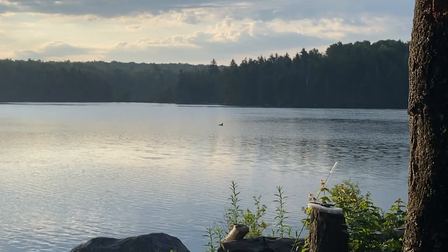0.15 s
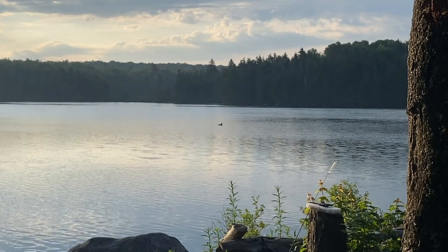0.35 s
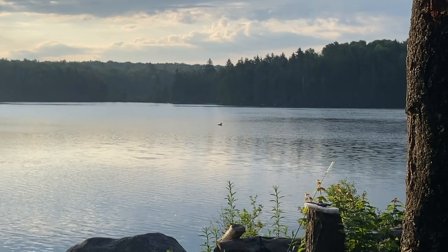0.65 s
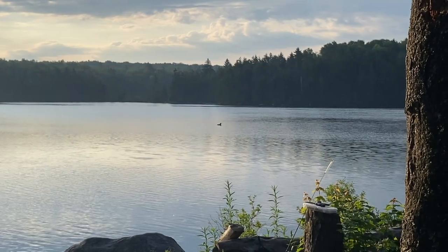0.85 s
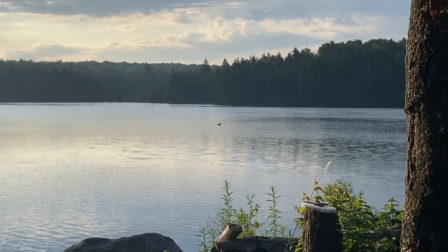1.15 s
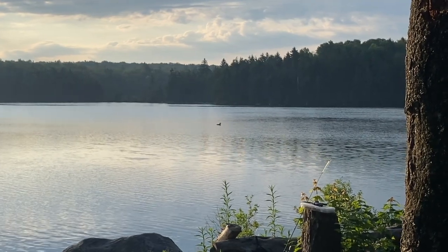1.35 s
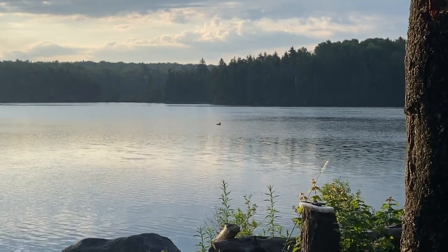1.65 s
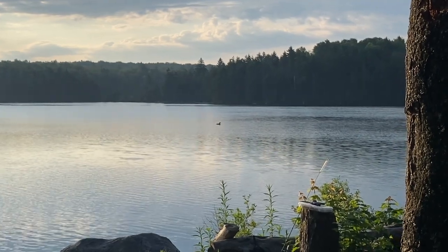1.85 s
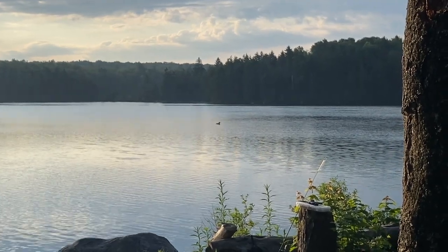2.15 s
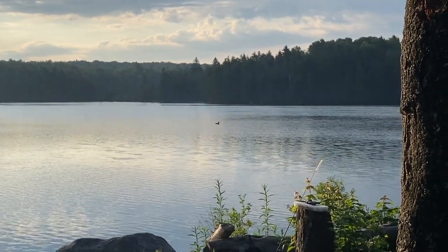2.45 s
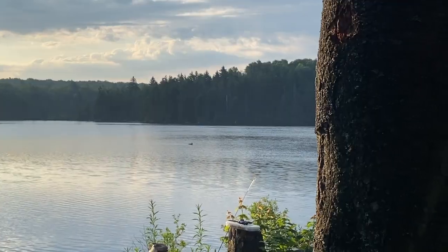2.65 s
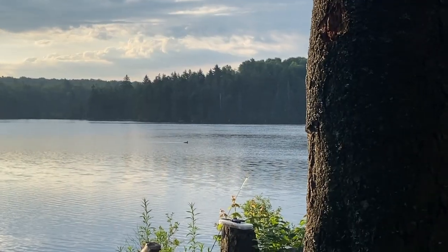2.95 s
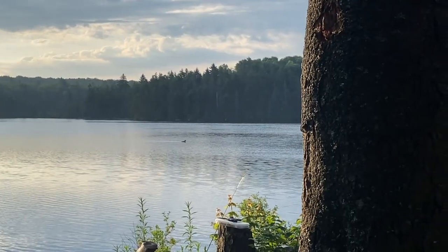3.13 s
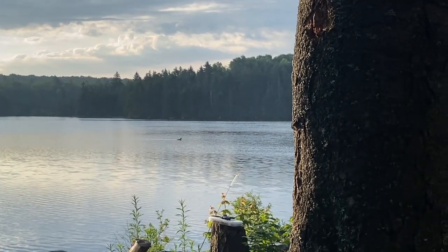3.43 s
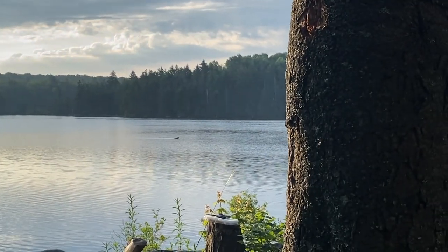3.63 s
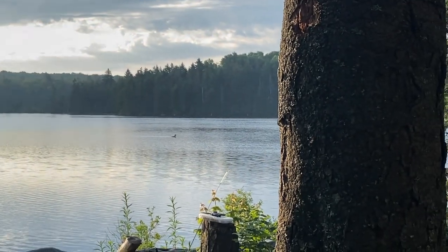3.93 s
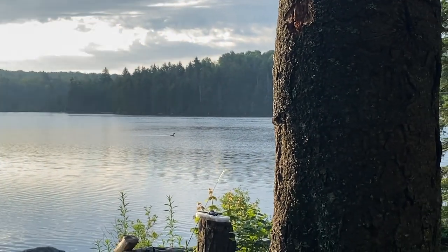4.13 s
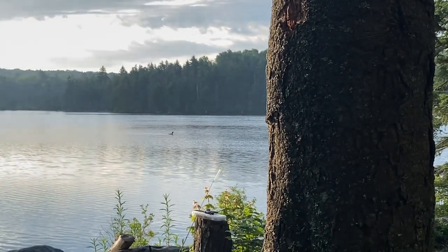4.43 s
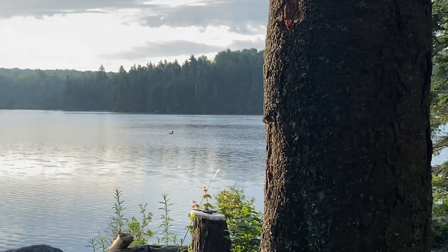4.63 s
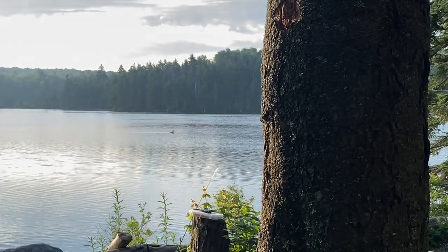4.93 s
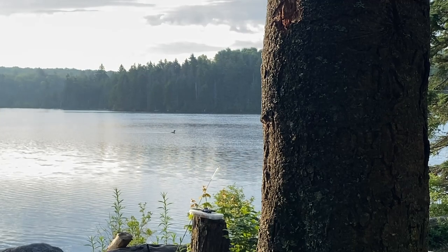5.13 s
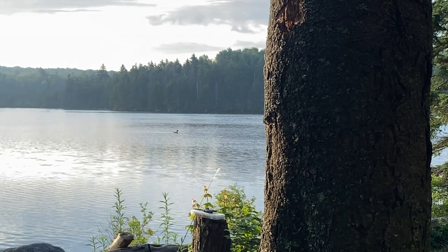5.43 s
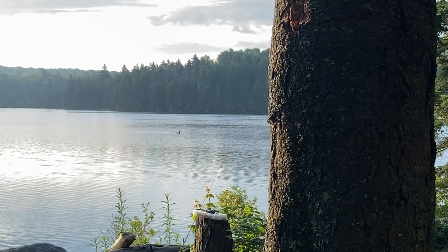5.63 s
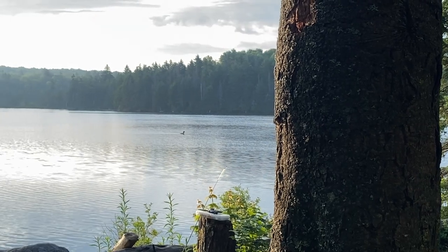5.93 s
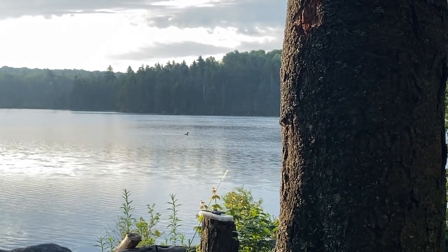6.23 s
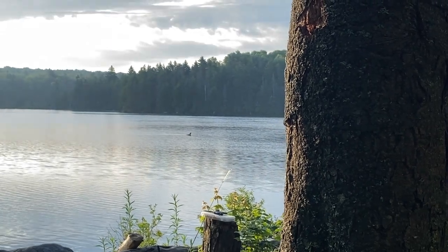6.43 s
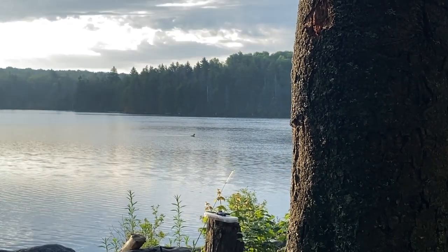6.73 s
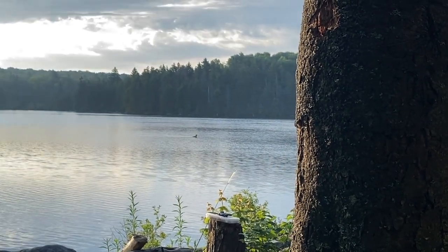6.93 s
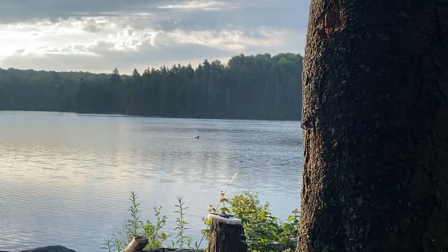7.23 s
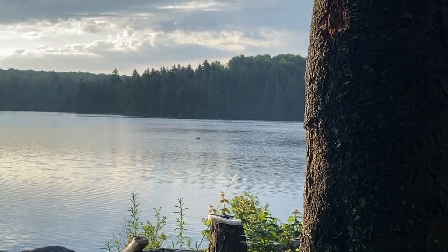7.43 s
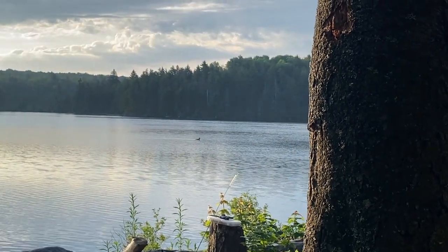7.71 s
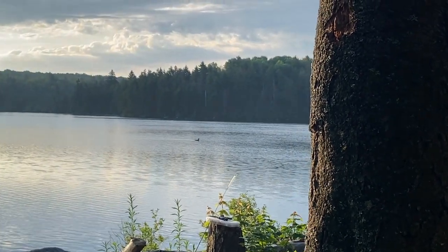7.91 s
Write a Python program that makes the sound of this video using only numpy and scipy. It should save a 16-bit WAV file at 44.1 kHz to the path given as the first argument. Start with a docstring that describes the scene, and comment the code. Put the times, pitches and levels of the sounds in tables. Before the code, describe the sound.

Over faint hiss on a quiet forest lake, birds chirp and twigs tick; then a loon gives two loud quavering calls that echo across the water.

```python
"""The far echo of an earlier loon call dies away over faint hiss and rumble, shaped from noise, on a forest lake.
Twigs tick (noise bursts) and songbirds whistle (gliding or warbling sines with short scatter from the trees).
From 2.6 s the background noise is abruptly louder; then a loon gives two quavering tremolo calls.
Its voice, a harmonic series whose pitch, level and overtones swing together, breaks between registers.
Soft hoots and far wails surround it; a long wash and a late echo return by convolution with scattered noise."""
import sys
import numpy as np
from scipy import signal
from scipy.fft import rfft, irfft, next_fast_len
from scipy.io import wavfile

SR = 44100
rng = np.random.default_rng(int(sys.argv[2]) if len(sys.argv) > 2 else 0)


def wav_record(signal):
    """Record a signal, one row per channel, as 16-bit PCM in the file named by sys.argv[1]."""
    frames = np.transpose(np.atleast_2d(signal))
    bounded = np.clip(frames, -1, 1)
    # unit amplitude maps onto the largest positive 16-bit level
    quanta = np.round(bounded * 32767).astype(np.int16)
    wavfile.write(sys.argv[1], SR, quanta)


N = 355887
TIME = np.arange(N) / SR

# Harmonic spectra of the loon's registers: level/dB of harmonics 1, 2, 3, ..
LOW_TONE = [2, -2, -26, -46, -22, -31, -34, -39.5, -43, -43]
MIDDLE_TONE = [0.5, -23.5, -12, -11.5, -37.5, -29, -47, -68, -55, -59]
PRESSED_TONE = [4.5, -21.5, -28, -26, -35.5, -38, -46.5, -75, -70, -73.5]
HIGH_TONE = [-3.3, -33.5, -31, -31.5, -45, -48.5, -64, -53, -52.5]
FALL_TONE = [1.5, -19.5, -22, -26, -35, -41, -28.5, -50]
# Loon notes, one per register; start and end values describe the crests of pitch, dips the troughs
# (a negative level dip makes the trough louder):
# start t/s, end t/s, start f/Hz, end f/Hz, pitch dip/share, start level/dB, end level/dB, level dip/dB,
# overtones at start/dB, overtones at end/dB, overtone dip/dB, harmonic spectrum (which adds to the levels)
LOON = [(3.962, 4.186, 714, 792, .205, -24.5, -25.5, 7.5, -3, 12, 40, LOW_TONE),
        (4.181, 4.553, 1154, 1078, .22, -17.3, -15.3, 11, -7, -13, 26, MIDDLE_TONE),
        (4.548, 4.630, 602, 598, .06, -30, -33, 9, -35, -35, 8, LOW_TONE),
        (5.324, 5.420, 680, 790, .185, -39, -28, -3, 14, 10, 45, LOW_TONE),
        (5.421, 5.566, 1118, 1168, .19, -18.3, -13.5, 11, 3, 2.5, 16, PRESSED_TONE),
        (5.574, 5.874, 1402, 1348, .2, -7, -10, 15, -11, 8.5, 1, HIGH_TONE),
        (5.872, 5.990, 1034, 1005, .18, -19.5, -23, 14, 3, -4, 4, FALL_TONE)]
# First crest of each call: t/s
CALL_CRESTS_S = [3.998, 5.329]
QUAVER_HZ = 10.2   # crests per second, running on through the breaks of register
CREST_BREADTH = 1.15   # above 1 level and brightness hold their crest values for longer
LEAD_IN_SHARE = .5   # share of the pitch dip from which a call slides up to its first crest

# Diffuse echo of each shore (near bank, woods all round, far shore), before the lake's tone shaping:
# delay t/s, energy per second at its height/dB, swell/(dB/s), decay/(dB/s)
SHORES = [(.03, 2.5, 600, 56), (.3, -27.5, 100, 6.5), (1.13, -17.5, 120, 75)]
# Reflections from nearby trunks and water, before band-pass: delay t/s, left level/dB, right level/dB
REFLECTIONS = [(0.019, -12.5, -28), (.038, -25, -20)]
# The earlier call's echoes are this call's echoes from 6.85 s onward, at a lower level
EARLIER_S, EARLIER_DB = 6.85, -13.5

# Soft hoots and far wails of loons, before flutter and scatter:
# t/s, length/s, start f/Hz, end f/Hz, level/dB
HOOTS = [(3.855, .056, 760, 920, -53), (3.895, .042, 600, 530, -50), (3.925, .052, 440, 408, -47.5),
         (5.98, .022, 588, 560, -44), (7.40, .27, 866, 846, -58), (7.66, .26, 864, 848, -58.5),
         (7.92, .16, 856, 840, -65)]
# Near songbird phrases, each a glide with a warble on it, before flutter and scatter:
# t/s, length/s, start f/Hz, end f/Hz, warble/share, warble f/Hz, first crest after start/s, level/dB
PHRASES = [(.525, .045, 2380, 2080, .01, 15, .02, -71.5), (.63, .17, 4600, 3800, .09, 8, .025, -79),
           (.82, .2, 2600, 2950, .15, 8, .04, -77), (1.69, .2, 3000, 3000, .16, 8, .06, -74),
           (2.745, .105, 2700, 3350, .04, 20, .032, -60), (2.852, .034, 3150, 2280, .01, 15, .01, -53),
           (2.938, .075, 2650, 2800, .07, 22, .032, -52.5), (3.853, .165, 4120, 3520, .02, 30, .01, -46),
           (3.878, .072, 2800, 3100, .17, 12, .075, -55), (4.58, .18, 3000, 2750, .09, 10, .075, -50),
           (4.755, .145, 2450, 2700, .16, 10, .095, -53), (6.555, .05, 5050, 5050, .005, 15, .01, -69),
           (6.68, .125, 3300, 3380, .045, 7, .058, -43), (6.765, .055, 2780, 2740, .015, 15, .058, -52.5),
           (6.8, .2, 3400, 3100, .12, 21, .025, -59), (6.903, .06, 2540, 2690, .01, 15, .01, -53.5),
           (6.99, .022, 3150, 2700, .01, 15, .01, -56), (7.885, .125, 2650, 3450, .08, 14, .037, -65)]
# Fluttering song deeper in the forest, before flutter and scatter:
# t/s, length/s, start f/Hz, end f/Hz, level/dB
FOREST_SONG = [(2.25, .28, 4700, 3800, -85), (3.725, .04, 5000, 4100, -68), (3.805, .025, 3700, 4500, -63),
               (3.89, .15, 4050, 3520, -51.5), (4.21, .12, 3300, 2600, -53), (4.54, .1, 3300, 2720, -59),
               (6.08, .17, 4700, 3850, -64), (6.27, .28, 3850, 4500, -67), (6.65, .07, 4650, 4300, -61),
               (6.69, .17, 3400, 3200, -54), (6.78, .07, 3450, 4450, -55), (6.86, .15, 4400, 3400, -61)]
# Twig ticks: t/s, peak level/dB, centre f/Hz, bandwidth/octaves
TICKS = [(0.401, -44.5, 1830, 2), (0.425, -63, 4500, 0.54), (.737, -58.5, 2600, 0.68),
         (0.882, -52, 2690, 1), (1.741, -59, 7200, 0.34), (1.863, -60, 11000, 0.77),
         (1.881, -59, 11500, .3)]

# Level of the low wind before its puffs: t/s, level/dB
WIND_DB = [(0, -75), (1.1, -80), (2.58, -67), (2.62, -57.5), (4.3, -57.5), (5, -64), (5.8, -58.5),
           (6.7, -64), (8.07, -69.5)]
# Relative spectrum of the low wind: f/Hz, density level/dB
WIND = [(20, -21), (35, -15.5), (58, -5.5), (90, -8), (130, -13.5), (250, -33), (1000, -75.5)]
GUST_DB, GUST_RATE_HZ = 2.0, 5   # spread and rate of the wind's random puffs
# Level of the rumble: t/s, level/dB
RUMBLE_DB = [(0, -69), (1.2, -72.5), (1.8, -68.5), (2.59, -67), (2.61, -58), (5.0, -56.5), (7.3, -57.5),
             (8.07, -63)]
# Relative spectrum of the rumble: f/Hz, density level/dB
RUMBLE = [(40, -31.5), (90, -3), (140, -1), (220, -1), (350, -3.3), (520, -5.7), (720, -8.5), (950, -21),
          (1500, -35), (3000, -59.5)]
# Level of the hiss: t/s, level/dB
HISS_DB = [(0, -75.5), (2.59, -75), (2.611, -64.3), (8.07, -64.7)]
# Relative spectrum of the hiss: f/Hz, density level/dB
HISS = [(500, -10.5), (900, -2), (1500, -8), (2500, -10), (4500, -14.5), (7500, -17), (8500, -20.5),
        (11500, -19), (12500, -37)]
# Coherence of the background noise: f/Hz, left-right correlation
LIKENESS = [(30, 0.9), (120, 0.88), (500, 0.57), (2000, 0.88), (7000, .75), (10000, 0.22)]
# Interchannel phase: f/Hz, lead of the left microphone/rad
LEAD = [(600, .6), (1200, .55), (6500, .58), (9000, 1.6)]
CUTOFF_HZ = 12500


def loon():
    """Register breaks: the notes of each call follow one another with leaps of pitch."""
    out = np.zeros(N)
    for note in LOON:
        add(out, note[0], loon_note(note))
    return out


def loon_note(note, shimmer_db=1.5, bright_hz=3500, bright_lag_s=.003, crack_db=12, rasp_db=-43):
    """Joint modulation: a harmonic voice is high and bright on the crests, and in most notes also loud."""
    jitter, flutter_db = .0026, 1.8   # random spread of pitch (share) and of each overtone (dB)
    break_s, crack_s = .007, .015   # ramp at each end; decay of the rasp's flare
    (start, end, start_hz, end_hz, dip, start_db, end_db, dip_db,
     bright_start_db, bright_end_db, bright_dip_db, tone) = note
    t = np.arange(start, end, 1 / SR)
    size = len(t)

    # 0 on the crests, 1 in the troughs; brightness lags slightly behind
    crest = max(s for s in CALL_CRESTS_S if s < end)
    trough = np.sin(np.pi * QUAVER_HZ * (t - crest)) ** 2
    dull = (np.sin(np.pi * QUAVER_HZ * (t - crest - bright_lag_s)) ** 2) ** CREST_BREADTH

    dip_share = dip * np.where(t < crest, LEAD_IN_SHARE, 1)
    hz = glide(start_hz, end_hz, size) * (1 - dip_share * trough)
    level_db = glide(start_db, end_db, size) - dip_db * trough ** CREST_BREADTH
    crest_bright = from_db(glide(bright_start_db, bright_end_db, size))
    bright = crest_bright * (1 - dull + dull * from_db(-bright_dip_db / 2)) ** 2

    unsteady_hz = hz * (1 + jitter * drift(100, SR)[:size])
    phase = 2 * np.pi * np.cumsum(unsteady_hz) / SR
    voice = from_db(tone[0]) * np.sin(phase)
    for k, db in enumerate(tone[1:], 2):
        ratio = k * hz.mean() / bright_hz
        reach = min(ratio ** 2, 1 / ratio)   # effort acts most on the overtones around bright_hz
        overtone_gain = from_db(db + flutter_db * drift(60, SR)[:size]) * bright ** reach
        voice += overtone_gain * np.sin(k * phase)

    # a faint rasp of air, pulsed by the voice, flares as each register catches
    rasp = rms_one(band(rng.standard_normal(SR), 1500, 6500))[:size]
    flare_db = crack_db * np.exp(-(t - start) / crack_s)
    voice += rasp * (1 + np.sin(phase)) * from_db(rasp_db + flare_db)

    # a register starts and stops abruptly
    gate = np.clip(np.minimum(t - start, end - t) / break_s, 0, 1)
    return voice * gate * from_db(level_db + shimmer_db * drift(68, SR)[:size])


def lake_response(treble_db=2.5, treble_loss_db_per_s=55, bass_db=-2.5, bass_gain_db_per_s=5):
    """Diffuse reverberation: lows are wide and last longest; treble is coherent and fades soonest."""
    t = np.arange(3 * SR) / SR
    scatter = rng.standard_normal((5, len(t))) * shore_envelope(t) / np.sqrt(SR)
    bass = band(scatter[:2], 200, 800) * from_db(bass_db + bass_gain_db_per_s * t)
    middle = band(scatter[2:4], 800, 1600)
    treble_gain = from_db(treble_db - treble_loss_db_per_s * t) * np.minimum(t / .025, 1)
    treble = band(scatter[4], 1700, 12000) * treble_gain
    # near reflections are dull and from the sides: opposite in phase at the two microphones
    near = np.zeros((2, len(t)))
    for delay, left_db, right_db in REFLECTIONS:
        near[:, int(delay * SR)] += from_db([left_db, right_db]) * [1, -1]
    near = band(near + 1e-18, 200, 1700)
    return widen(bass + middle, alike=-.3) + ahead(treble) + near


def shore_envelope(t):
    """Incoherent superposition: the echoes of all shores add up in power."""
    power = 0
    for delay, db, swell, decay in SHORES:
        drop_db = np.maximum(swell * (delay - t), decay * (t - delay))
        power = power + from_db(db - drop_db) ** 2
    return np.sqrt(power)


def earlier_call(echoes):
    """Reverberant decay: an earlier call of the same shape has left only its far echoes."""
    tail = echoes[:, int(EARLIER_S * SR):]
    return np.pad(tail, ((0, 0), (0, N)))[:, :N] * from_db(EARLIER_DB)


def hoots():
    """Gliding pure tones with forest reverberation: soft hoots and far wails of loons."""
    return in_forest(whistles(HOOTS, waver=.004), wet_db=-8, t60=.6)


def songbirds():
    """Direct-to-scattered ratio: near birds are clear, far ones are blurred by the trees."""
    near = in_forest(warbles(waver=.012), wet_db=-5.5, t60=.25)
    far = in_forest(whistles(FOREST_SONG, waver=.04), wet_db=3, t60=.3)
    return near + far


def warbles(waver):
    """Sinusoidal frequency modulation: whistles whose pitch swings up and down as it slides."""
    out = np.zeros(N)
    for s, length, start_hz, end_hz, swing, rate, crest_s, db in PHRASES:
        t = np.arange(int(length * SR)) / SR
        warble = 1 + swing * np.cos(2 * np.pi * rate * (t - crest_s))
        add(out, s, whistle(glide(start_hz, end_hz, len(t)) * warble, db, waver))
    return out


def whistles(table, waver):
    """Linear frequency glide: whistles that slide straight from one pitch to another."""
    out = np.zeros(N)
    for s, length, start_hz, end_hz, db in table:
        add(out, s, whistle(glide(start_hz, end_hz, int(length * SR)), db, waver))
    return out


def whistle(hz, db, waver, flutter_db=2.5):
    """Phase is integrated frequency: an unsteady, fluttering pure tone swells and fades along a pitch line."""
    size = len(hz)
    unsteady = 1 + waver * drift(200, SR)[:size]
    swell = np.sin(glide(0, np.pi, size))
    level = from_db(db + flutter_db * drift(50, SR)[:size]) * swell
    return level * np.sin(2 * np.pi * np.cumsum(hz * unsteady) / SR)


def ticks(snap_s=0.0011, tail_s=0.02, tail_db=-17):
    """Band-limited impulse noise with two decays: a dry snap and a short rustling tail."""
    out, t = np.zeros(N), np.arange(SR // 10) / SR
    for s, db, hz, octaves in TICKS:
        decay = np.exp(-t / snap_s) + from_db(tail_db) * np.exp(-t / tail_s)
        burst = rng.standard_normal(len(t)) * decay
        half_band = 2 ** (octaves / 2)
        edges = np.minimum([hz / half_band, hz * half_band], SR / 2 - 1)
        snap = signal.sosfilt(signal.butter(2, edges, "band", fs=SR, output="sos"), burst)
        add(out, s, from_db(db) * snap / np.abs(snap).max())
    return out


def background():
    """Superposed noise bands: low wind in random puffs, rumble and hiss."""
    puffs = from_db(GUST_DB * drift(GUST_RATE_HZ, N))
    wind = smooth_noise(WIND, WIND_DB) * puffs
    return wind + smooth_noise(RUMBLE, RUMBLE_DB) + smooth_noise(HISS, HISS_DB)


def smooth_noise(spectrum, level_db):
    """Partly coherent random noise, shaped in frequency and then in level over time."""
    size = next_fast_len(N)
    hz = np.arange(size // 2 + 1) * SR / size
    pair = rfft(rng.standard_normal((2, size)))
    noise = widen(pair, at_hz(LIKENESS, hz)) * from_db(at_hz(spectrum, hz))
    return rms_one(irfft(noise, size)[:, :N]) * from_db(curve(level_db, TIME))


def in_forest(x, wet_db, t60):
    """Exponential reverberation: direct sound plus scatter from trunks and leaves."""
    t = np.arange(SR) / SR
    decaying_noise = rng.standard_normal((1, SR)) * from_db(-60 * t / t60)
    response = rms_one(decaying_noise) / np.sqrt(SR)   # unit energy
    return ahead(x + from_db(wet_db) * convolve(x, response)[0, :N])


def ahead(x):
    """Interchannel phase difference: equally loud in both microphones, the left one leading in phase."""
    size = next_fast_len(len(x))
    lead = at_hz(LEAD, np.arange(size // 2 + 1) * SR / size)
    turn = np.exp(.5j * lead * np.array([[1], [-1]]))
    return irfft(rfft(x, size) * turn, size)[:, :len(x)]


def widen(pair, alike):
    """Sum and difference mixing: two unrelated signals become left and right with a given correlation."""
    c = np.clip(alike, -1, 1)
    common = np.sqrt(1 + c) * pair[0]
    opposed = np.sqrt(1 - c) * pair[1] * [[1], [-1]]
    return (common + opposed) / np.sqrt(2)


def convolve(x, response):
    """Linear superposition of echoes: play a sound through an impulse response."""
    return signal.fftconvolve(np.atleast_2d(x), response, axes=1)


def drift(rate, size):
    """Low-pass filtered chance: smooth random fluctuation with rms 1."""
    r = np.exp(-2 * np.pi * rate / SR)
    noise = rng.standard_normal(size + SR)
    return rms_one(signal.lfilter([1], [1, -2 * r, r * r], noise)[SR:])   # the first second settles


def band(x, low_hz, high_hz):
    """Frequency selection by a steep band-pass."""
    return signal.sosfilt(signal.butter(4, [low_hz, high_hz], "band", fs=SR, output="sos"), x)


def at_hz(points, hz):
    """Logarithmic frequency axis: read a spectrum between its points."""
    f, value = np.transpose(points)
    return np.interp(np.log(hz + 1), np.log(f), value)


def curve(rows, t):
    """Linear interpolation in time between (t/s, value) rows."""
    return np.interp(t, *np.transpose(rows))


def glide(start, end, size):
    """Linear change: a straight slide, one value per sample."""
    return np.linspace(start, end, size)


def from_db(db):
    """Logarithmic level: decibels to amplitude gain."""
    return 10 ** (np.asarray(db) / 20)


def rms_one(x):
    """Effective value: scale to rms 1."""
    return x / np.sqrt(np.mean(x ** 2) + 1e-20)


def add(out, start_s, sound):
    """Superposition: mix a short sound in at its time."""
    i = max(round(start_s * SR), 0)
    out[i:i + len(sound)] += sound[:max(N - i, 0)]


def scene():
    """Superposition of loon and lake echoes, hoots, songbirds, twigs and background noise."""
    call = loon()
    echoes = convolve(call, lake_response())
    loons = ahead(call) + echoes[:, :N] + earlier_call(echoes) + hoots()
    return loons + songbirds() + ticks() + background()


def record(dry):
    """Low-pass filtering: the top is cut steeply."""
    return signal.sosfilt(signal.ellip(10, .1, 80, CUTOFF_HZ, fs=SR, output="sos"), dry)


dry = scene()
out = record(dry)
wav_record(out)
```